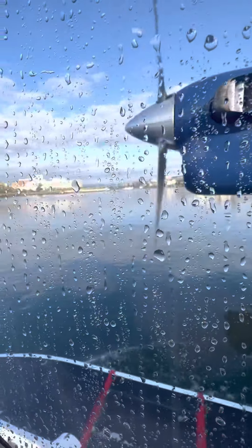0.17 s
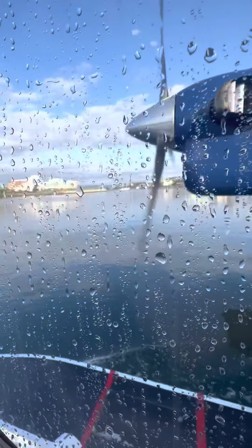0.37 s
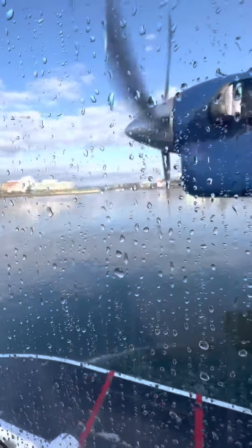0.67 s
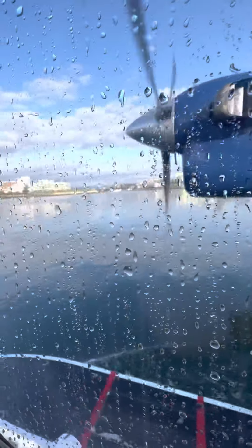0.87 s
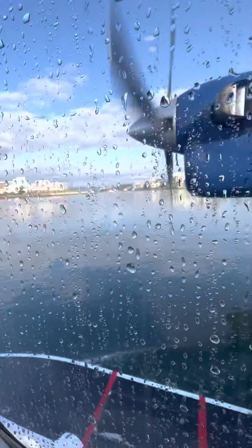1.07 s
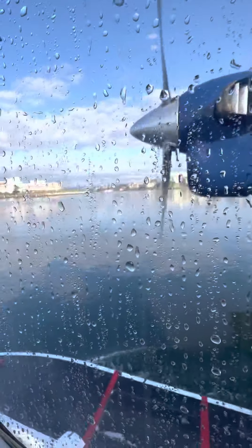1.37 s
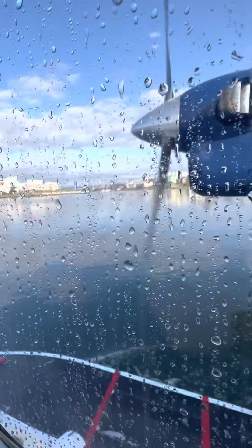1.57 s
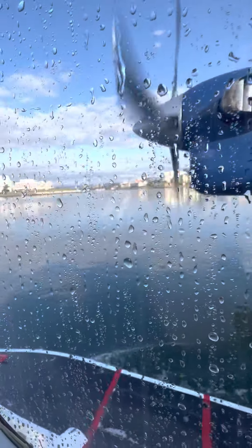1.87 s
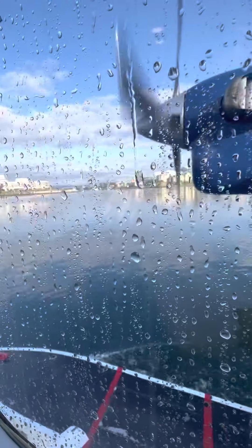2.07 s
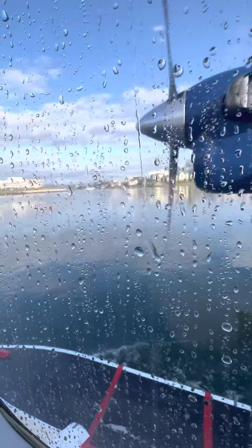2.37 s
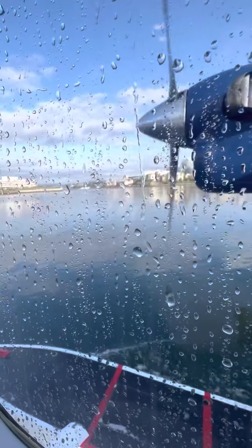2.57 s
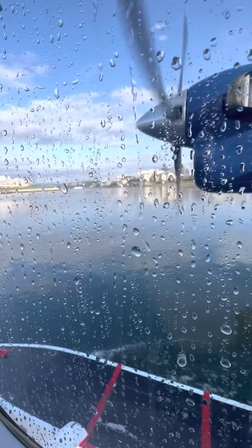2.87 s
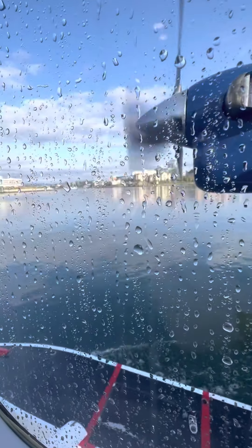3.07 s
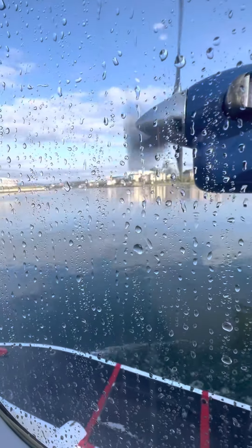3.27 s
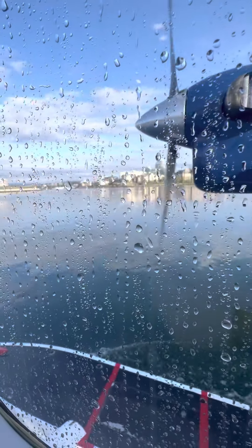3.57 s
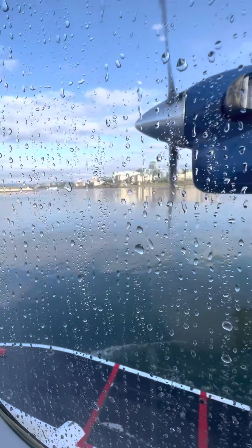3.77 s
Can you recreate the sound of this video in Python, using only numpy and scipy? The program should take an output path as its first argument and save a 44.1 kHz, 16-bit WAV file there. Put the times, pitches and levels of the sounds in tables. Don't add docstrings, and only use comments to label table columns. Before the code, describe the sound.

Inside a small floatplane taxiing on calm water, the propeller engine throbs and buffets continuously, low and dense, under soft hissing spray; late on, a faint electric pump spins up. Microphone at the window seat.

```python
import sys
import numpy as np
from scipy import signal
from scipy.fft import rfft, irfft, next_fast_len
from scipy.io import wavfile

SR = 44100
rng = np.random.default_rng(int(sys.argv[2]) if len(sys.argv) > 2 else 0)


def field_ratio(decibels):
    return 10 ** (np.asarray(decibels, dtype=float) / 20)


def to_wav(s):
    ch = np.atleast_2d(s).T
    pcm = np.round(np.clip(ch, -1, 1) * 32767)
    wavfile.write(sys.argv[1], SR, pcm.astype(np.int16))


N = 173313


def rms_one(x):
    return x / np.sqrt(np.mean(np.abs(x) ** 2) + 1e-20)


def in_time(rows):
    s, *columns = np.transpose(rows)
    return [np.interp(np.arange(N) / SR, s, column) for column in columns]


def at_hz(points, hz):
    point_hz, value = np.array(points)[:, 0], np.array(points)[:, 1]
    return np.interp(np.log(hz), np.log(point_hz), value)


def drift(rate_hz):
    hop, settle = 40, 2000
    pole = np.exp(-2 * np.pi * rate_hz * hop / SR)
    white = rng.standard_normal(N // hop + settle + 2)
    slow = signal.lfilter([1], [1, -2 * pole, pole * pole], white)[settle:]
    return np.interp(np.arange(N) / hop, np.arange(len(slow)), rms_one(slow))


def wavering(turns, width_hz, steady):
    steady = np.clip(steady, 0, 1)
    turbulent = np.sqrt((1 - steady ** 2) / 2) * (drift(width_hz) + 1j * drift(width_hz))
    return np.sqrt(2) * np.real((steady + turbulent) * np.exp(2j * np.pi * turns))


def swell(centre_s, length_s):
    phase = (np.arange(N) / SR - centre_s) / max(length_s, .03)
    return np.cos(np.pi * np.clip(phase, -.5, .5)) ** 2


def white_pair():
    # frequency in Hz, share of the side that is the lagging mid (-1 to 1).
    lag_share = [(600, 0.1), (950, -.3), (1400, -0.3), (2500, -0.6), (4000, .25), (7200, .1), (8700, .6),
                 (12000, .7), (16000, .4)]
    mid, free = rfft(rng.standard_normal((2, N)), axis=1)
    share = np.clip(at_hz(lag_share, np.maximum(np.fft.rfftfreq(N, 1 / SR), 1)), -1, 1)
    return mid, np.sqrt(1 - share ** 2) * free - 1j * share * mid


def coloured(white, spectrum, patchy_db, hollows=()):
    hz = np.maximum(np.fft.rfftfreq(N, 1 / SR), 1)
    shape = field_ratio(at_hz(spectrum, hz))
    for centre_hz, width_hz, depth in hollows:
        resonance = 1 / (1 + (2 * (hz - centre_hz) / width_hz) ** 2)
        shape = shape * (1 - np.clip(depth, 0, .95) * resonance)
    full, together, out = white * shape, drift(2.1), 0
    octave = np.log2(np.clip(hz, 32, 16384))
    for k in range(5, 15):
        share = np.cos(np.pi / 2 * np.clip(octave - k, -1, 1)) ** 2
        flicker_db = patchy_db * (.7 * together + drift(9.0))
        out = out + irfft(full * share, N) * field_ratio(flicker_db)
    return rms_one(out)


def spread(mid, side):
    return np.array([mid + side, mid - side])


def propellers():
    # multiple of its blade rate, level in dB.
    governed = [(4 / 3, -44)]
    # time in seconds, blade rate in Hz, first-order level in dB.
    near = [(0.0, 54.5, -30), (0.09, 52.7, -24), (0.56, 53.4, -24), (0.71, 51, -27.5), (0.77, 53.45, -20.5),
            (1.19, 55.6, -26), (1.32, 54.58, -23), (2.02, 54.7, -24), (2.17, 52.5, -33.5),
            (2.51, 53.36, -14.5), (2.6, 54.7, -23), (2.88, 54.8, -20.5), (3.1, 55, -38), (3.2, 56.2, -22),
            (3.48, 55.7, -29), (3.59, 55.64, -17), (3.9, 55.9, -34), (3.93, 56.5, -35)]
    # time in seconds, frequency in Hz, level in dB.
    third = [(0.0, 161.8, -15), (0.02, 162.3, -16.5), (0.32, 158.3, -34.5), (0.56, 162.6, -21.5),
             (0.85, 161.8, -23.5), (1.02, 153.1, -27.5), (1.18, 154.5, -25.5), (1.39, 161.9, -27),
             (1.53, 157.7, -10), (1.55, 157, -28), (1.62, 155.0, -26), (2.34, 158.4, -20.5),
             (2.41, 153, -24), (2.6, 163.6, -20), (2.95, 156, -30), (3.43, 165.5, -19.5),
             (3.73, 160.7, -21.5), (3.93, 161.0, -22)]
    # time in seconds, level in dB.
    loading = [(0.0, -31), (0.02, -22.5), (0.19, -22), (0.22, -24.5), (0.69, -19), (0.72, -20.5),
               (2.33, -21.5), (2.39, -17), (2.41, -24), (2.69, -18), (2.83, -26), (2.87, -22), (3.48, -21),
               (3.51, -18), (3.56, -23.5), (3.93, -21)]
    # multiple of the mean rate, mid level in dB, side level in dB, width in Hz.
    upper = [(1.85, -32, -58, 8.3), (2.5, -36, -58, 9.6), (3.4, -33, -55, 13), (4, -34, -58, 7.2),
             (5, -31.5, -56, 9.8), (6, -29, -47.5, 14), (7, -34, -45, 10.6), (8, -40, -60, 5.5),
             (9, -42, -57, 20), (10.1, -39.5, -43, 13.6), (11.1, -45, -44, 5.4), (12.1, -47, -51.5, 23)]
    governed_hz, near_mean_hz = 54.96, 53.75
    t = np.arange(N) / SR
    rate_hz, first_db = in_time(near)
    third_hz, third_db = in_time(third)
    load_db, = in_time(loading)
    mid = sum(field_ratio(db) * wavering(k * governed_hz * t, 1, 0.95) for k, db in governed)
    mid = mid + field_ratio(first_db) * wavering(np.cumsum(rate_hz) / SR, 6.0, .93)
    mid = mid + field_ratio(third_db - 4.0) * wavering(np.cumsum(third_hz) / SR, 4.7, 0.85)
    load = field_ratio(1.27 * (load_db - load_db.mean()))
    side = 0
    for k, db, side_db, width_hz in upper:
        turns = k * near_mean_hz * t
        mid = mid + load * field_ratio(db) * wavering(turns, width_hz, .45)
        side = side + load * field_ratio(side_db) * wavering(turns, width_hz, 0.049)
    return spread(mid, side)


def buffets():
    # centre in seconds, length in seconds, frequency in Hz, peak in dB.
    surges = [(0.115, 0.22, 108.1, -17.5), (0.244, 0.23, 108.5, -18.5), (0.39, 0.11, 105.7, -16.5),
              (0.52, 0.23, 109.6, -27), (0.645, 0.24, 109.5, -18), (0.766, 0.07, 108.6, -27),
              (0.883, 0.19, 106.9, -14.5), (1.052, 0.1, 106.8, -19), (1.171, 0.25, 106.1, -18),
              (1.337, 0.1, 101.8, -20), (1.49, 0.14, 104.8, -25), (1.62, 0.081, 105, -17.5),
              (1.745, 0.26, 108.1, -22.5), (1.884, 0.14, 108.9, -19.0), (1.981, 0.32, 109, -24),
              (2.101, 0.22, 107.2, -20), (2.198, 0.09, 109.2, -25), (2.347, 0.09, 107.8, -22),
              (2.5, 0.26, 108.4, -19), (2.65, 0.31, 105.6, -30), (2.836, 0.3, 107.3, -15),
              (2.96, 0.12, 104.9, -16.8), (3.076, 0.2, 104.2, -16.5), (3.229, 0.11, 106.2, -12.5),
              (3.42, 0.26, 106.7, -15.5), (3.589, 0.13, 108.9, -20.5), (3.701, 0.16, 104.5, -18),
              (3.896, 0.12, 106.5, -12.5)]
    # centre in seconds, length in seconds, frequency in Hz, peak in dB.
    flares = [(0.045, 0.33, 273.2, -22), (0.164, 0.21, 319.6, -24), (0.416, 0.24, 318.2, -25.5),
              (0.47, 0.046, 272, -20), (0.664, 0.16, 272.3, -22), (0.655, 0.17, 323, -24),
              (0.971, 0.06, 318.7, -15.5), (1.084, 0.1, 265.4, -25.8), (1.22, 0.15, 315.5, -23.5),
              (1.4, 0.067, 321.6, -18), (1.411, 0.081, 272, -24.3), (1.67, 0.08, 271.9, -25.6),
              (1.719, 0.14, 324, -23.5), (2.14, 0.091, 324.1, -21), (2.426, 0.055, 273.3, -26),
              (2.452, 0.1, 319, -19.5), (2.606, 0.21, 313.4, -19.5), (2.68, 0.16, 272.0, -23),
              (2.948, 0.11, 322.7, -22), (3.15, 0.2, 320.6, -25), (3.268, 0.073, 266.5, -27),
              (3.519, 0.19, 322.4, -22), (3.639, 0.13, 269.3, -23.6), (3.81, 0.17, 272.3, -20.5),
              (3.91, 0.061, 324.1, -23)]
    surge_hz = in_time(surges)[1]
    level = np.max([field_ratio(db) * swell(s, 1.25 * length) for s, length, _, db in surges], axis=0)
    level = field_ratio(-0.23) * np.maximum(level, field_ratio(-28.5))
    mid = level * wavering(np.cumsum(surge_hz) / SR, 3.6, .97)
    for s, length, hz, db in flares:
        tone = np.sin(2 * np.pi * (hz * np.arange(N) / SR + rng.random()))
        mid = mid + field_ratio(db + 1) * swell(s, 1.23 * length) * tone
    return spread(mid, 0)


def exhaust():
    # frequency in Hz, level in dB.
    roar = [(26, -19), (45, -1), (107, -1), (226, -3), (323, -5), (411, -7), (546, -11), (893, -23.5),
            (1600, -25.5), (2080, -102), (3520, -120)]
    roar_side = [(35, -44), (60, -6), (107, -15), (240, -36), (312, -6.5), (491, -4.5), (533, 0),
                 (1300, -17), (1600, -24), (2080, -57), (3520, -120)]
    rush = [(590, -91), (1000, -1), (2870, -9.5), (3670, -12), (5020, -14), (9280, -21), (10300, -71),
            (10800, -35), (16000, -24)]
    rush_side = [(590, -15), (1000, -6), (1650, -23), (2330, -2.5), (4260, -17), (5130, -8), (8070, -19.5),
                 (9940, -29), (16000, -22)]
    # centre in Hz, width in Hz, depth (0 to 1).
    hollows = [(55, 34, 0.23), (69.4, 14, 0.6), (241, 15.3, 0.6), (277, 14, 0.05), (399.6, 25, 1),
               (1520, 257, 0.72), (3370, 690, 0.3), (4840, 180, 0.15), (5630, 1300, 0.5)]
    (low, low_side), (high, high_side) = white_pair(), white_pair()
    mid = field_ratio(-23.5) * coloured(low, roar, 0.99, hollows)
    mid = mid + field_ratio(-43.5) * coloured(high, rush, 0.74, hollows)
    side = field_ratio(-34) * coloured(low_side, roar_side, 0.96)
    side = side + field_ratio(-45) * coloured(high_side, rush_side, .5)
    return spread(mid, side)


def spray():
    # time in seconds, level in dB.
    wake = [
        (0.0, -47.5),
        (1.0, -47.5),
        (1.4, -45.5),
        (1.9, -46),
        (2.25, -44.5),
        (2.7, -46),
        (3.3, -45.5),
        (3.93, -45),
    ]
    # frequency in Hz, level in dB.
    colour = [(1500, 2), (3000, -1.5), (6000, -0.5), (9000, 0.5), (12000, -3.5), (13000, -11), (14900, -10),
              (15800, -11)]
    db, = in_time(wake)
    gain = field_ratio(1.5 + db + 1.86 * (db - db.max()))
    mid, side = white_pair()
    return gain * spread(coloured(mid, colour, .45), field_ratio(-1.5) * coloured(side, colour, .45))


def pump():
    # multiple of the running pitch, level in dB, delay in seconds.
    partials = [(1, -54, .1), (2, -57, -.02), (2, -57, .2), (2.072, -53, .2), (3.70, -65, .16),
                (3.803, -62, .1), (3.855, -63, .1), (4, -65, .16), (5.005, -67, .2), (8.013, -71, .2),
                (5.993, -58.5, .38)]
    running_hz, on_s, spin_up_s, start_share = 1342, 3.25, .16, .82
    rise_s, width_hz = .06, 3
    t = np.arange(N) / SR - on_s
    turns = np.cumsum(running_hz * np.interp(t, [0, spin_up_s], [start_share, 1])) / SR
    mid, side = 0, 0
    for k, db, delay in partials:
        level = field_ratio(db) * np.clip((t - delay) / rise_s, 0, 1)
        mid = mid + level * wavering(k * turns + rng.random(), k * width_hz, .92)
        side = side + level * wavering(k * turns + rng.random(), k * width_hz, .92)
    return spread(mid, field_ratio(-5) * side)


def turbines():
    # frequency in Hz, level in dB, width in Hz, right-ear lead in turns.
    whines = [(1557, -61, 7, .02), (3115, -65, 4, .3), (4969, -62, 8, .3), (5105, -65, 8, .1),
              (10260, -72, 8, .25), (15315, -78, 10, .25), (5157, -70, 6, .3), (9940, -70.5, 8, .2),
              (14912, -74, 14, .25), (15368, -74, 14, .25), (8080, -73, 30, 0), (8970, -73, 20, .2),
              (11480, -71, 20, .2)]
    fading_hz, fade_from_s, fade_db = 10215, 1.4, -7
    t = np.arange(N) / SR
    fade = field_ratio(fade_db * np.clip((t - fade_from_s) / .2, 0, 1))
    out = 0
    for hz, db, width_hz, lead in [*whines, (fading_hz, -64.5, 4.0, .2)]:
        tone = signal.hilbert(wavering(hz * t, width_hz, .7), next_fast_len(N))[:N]
        tone = field_ratio(db + 2) * tone * (fade if hz == fading_hz else 1)
        out = out + np.real([tone, tone * np.exp(2j * np.pi * lead)])
    return out


def whistles():
    # start in seconds, length in seconds, frequency in Hz, level in dB, width in Hz.
    gusts = [
        (2.12, .4, 8050, -63, 60),
        (3.36, .12, 2712, -52, 12),
        (3.29, .1, 2290, -54, 15),
        (3.6, .33, 8560, -68, 15),
        (3.3, .6, 5000, -66, 60),
        (0.0, .3, 5050, -65, 60),
        (2.1, .3, 9150, -65, 120),
        (2.83, .14, 5350, -63, 20),
    ]
    t, out = np.arange(N) / SR, 0
    for start, length, hz, db, width_hz in gusts:
        level = field_ratio(db) * np.sin(np.pi * np.clip((t - start) / length, 0, 1))
        mid = level * wavering(hz * t, width_hz, .75)
        side = .4 * level * wavering(hz * t, width_hz, .2)
        out = out + spread(mid, side)
    return out


def scene():
    return propellers() + buffets() + exhaust() + spray() + pump() + turbines() + whistles()


def top_cut(x):
    return signal.sosfilt(signal.butter(12, 16350, fs=SR, output="sos"), x)


def record(dry):
    # frequency in Hz, difference in dB.
    lean = [(60, 0.5), (300, -1.5), (1300, -2.5), (1600, 0.5), (2300, 4), (2800, 0), (6800, 1),
            (9000, -0.5)]
    low_cut_hz, top_hz = 41, 15740
    size = N + 2 * SR
    hz = np.maximum(np.fft.rfftfreq(size, 1 / SR), 1)
    half_db = at_hz(lean, hz) / 2
    cut = (hz < top_hz) / np.sqrt(1 + (low_cut_hz / hz) ** 10.0)
    response = cut * field_ratio(np.array([half_db, -half_db]))
    spectrum = rfft(np.pad(dry, [(0, 0), (SR, SR)], "reflect"), axis=1)
    mix = irfft(spectrum * response, size, axis=1)[:, SR:-SR]
    return top_cut(mix)


dry = scene()
out = record(dry)
to_wav(out)
```